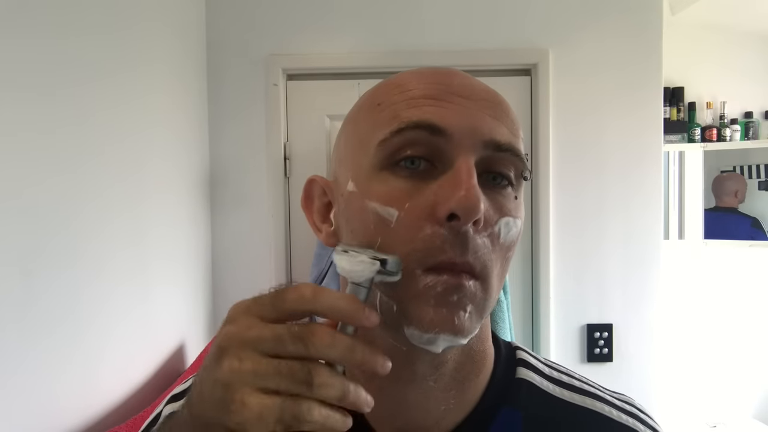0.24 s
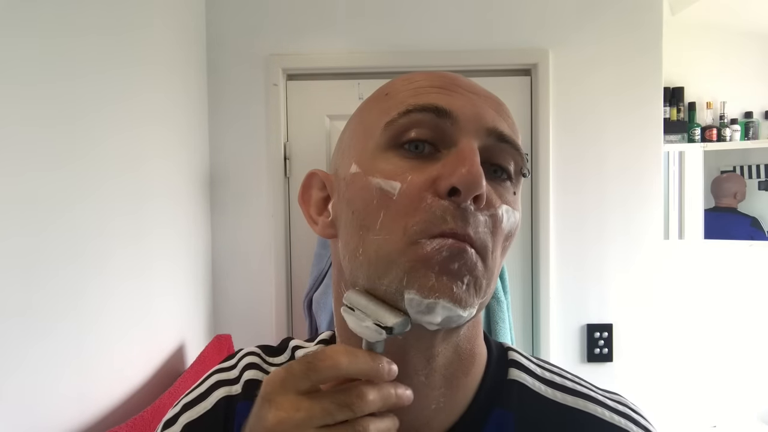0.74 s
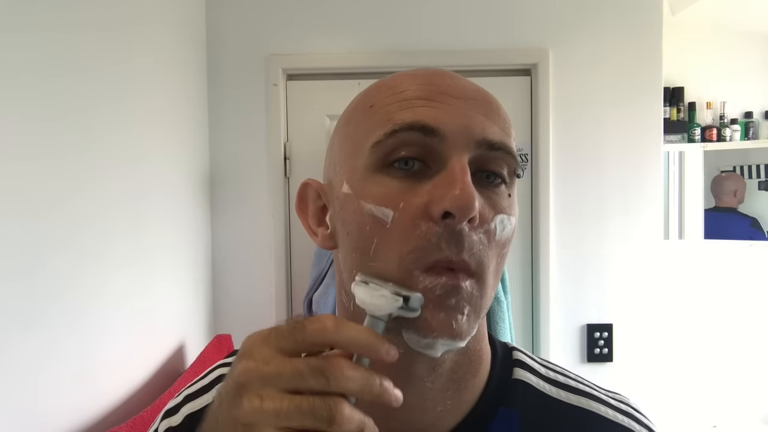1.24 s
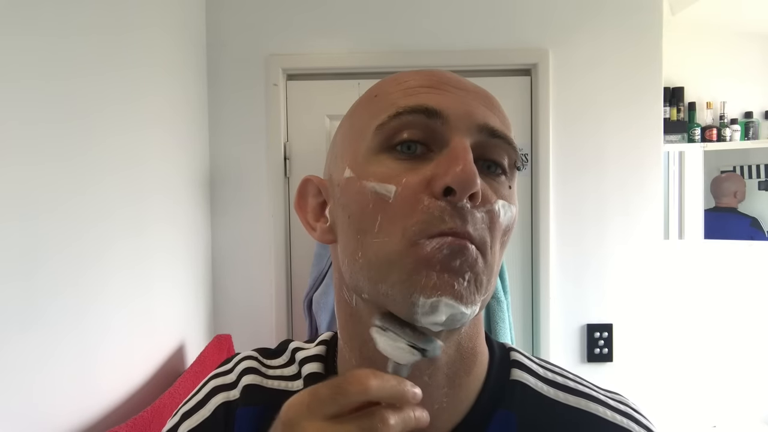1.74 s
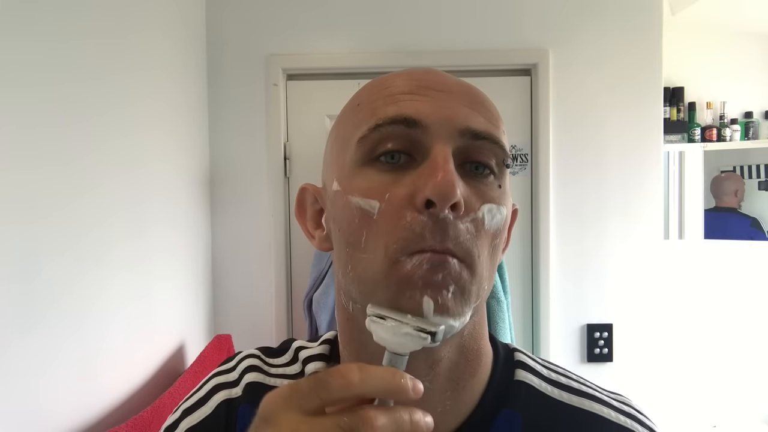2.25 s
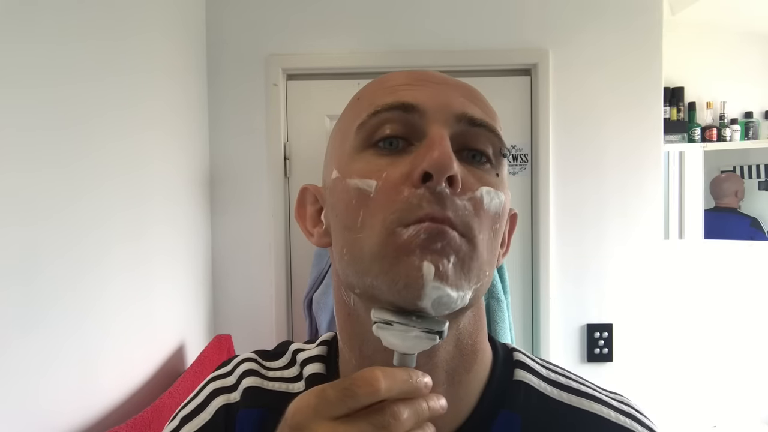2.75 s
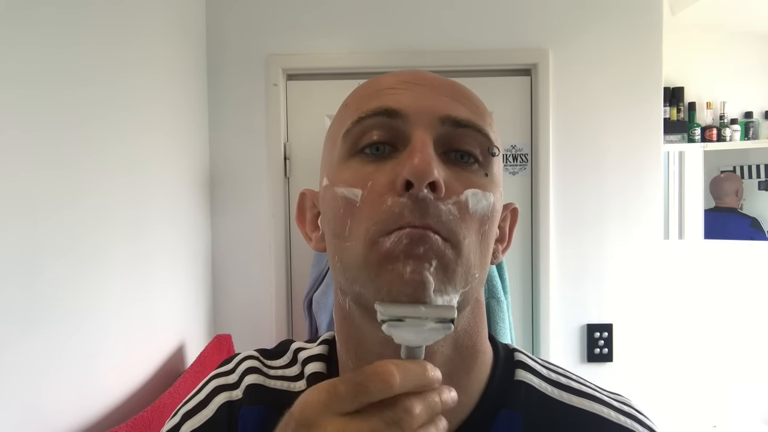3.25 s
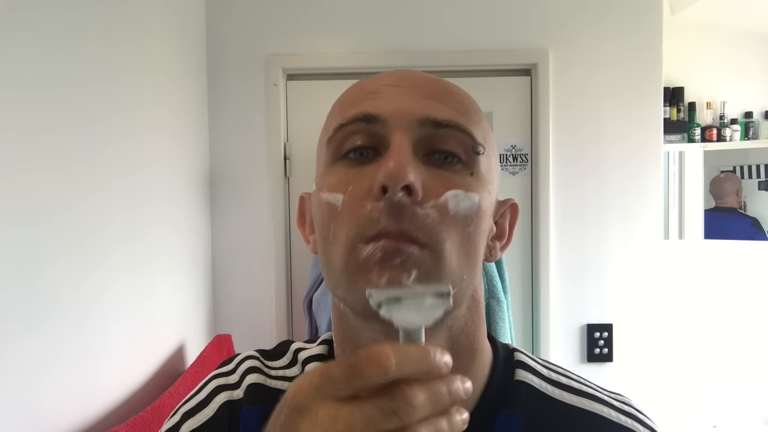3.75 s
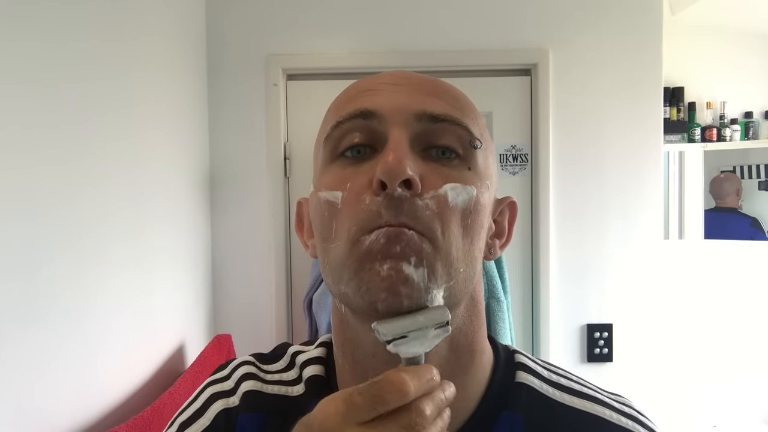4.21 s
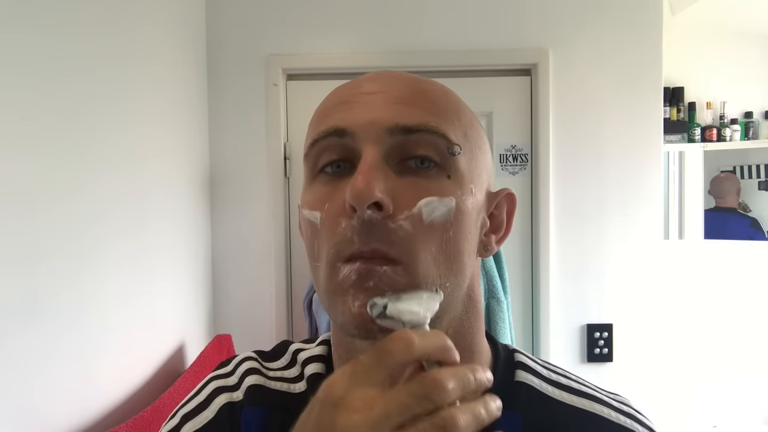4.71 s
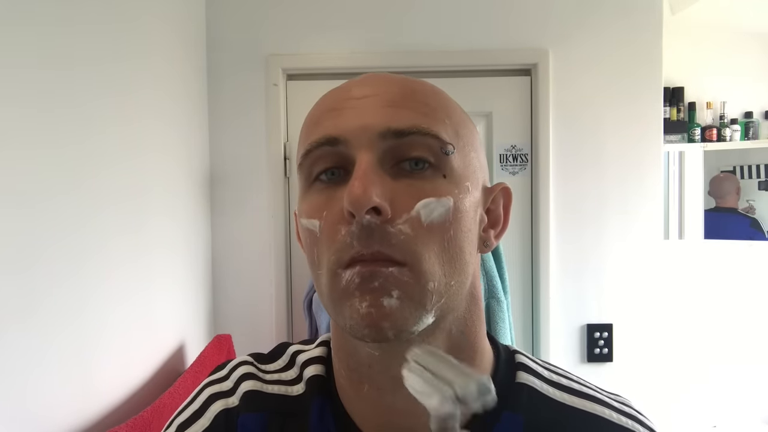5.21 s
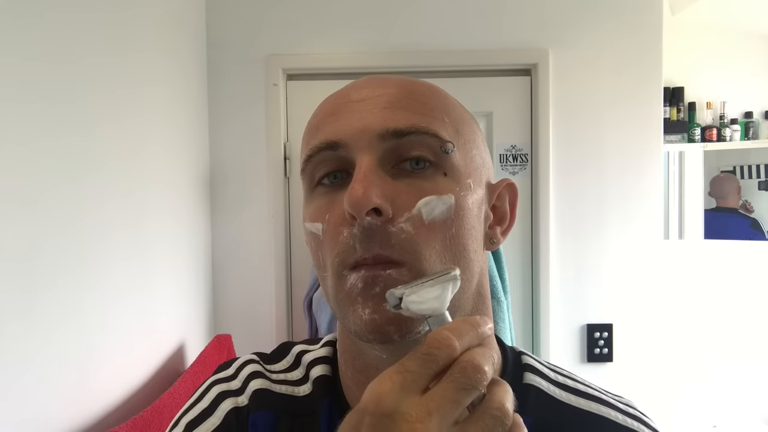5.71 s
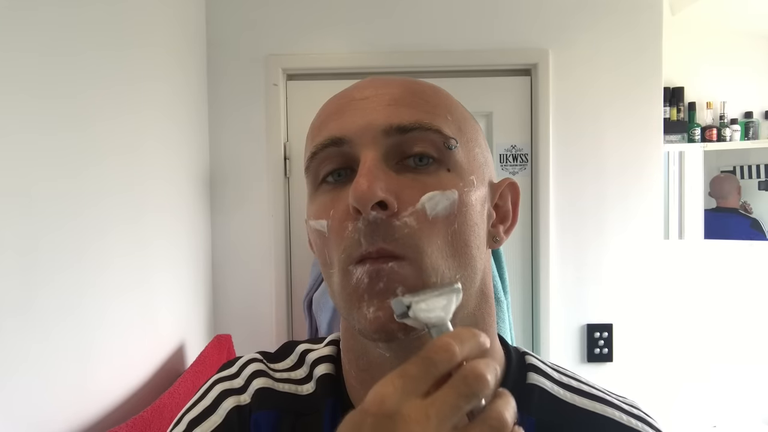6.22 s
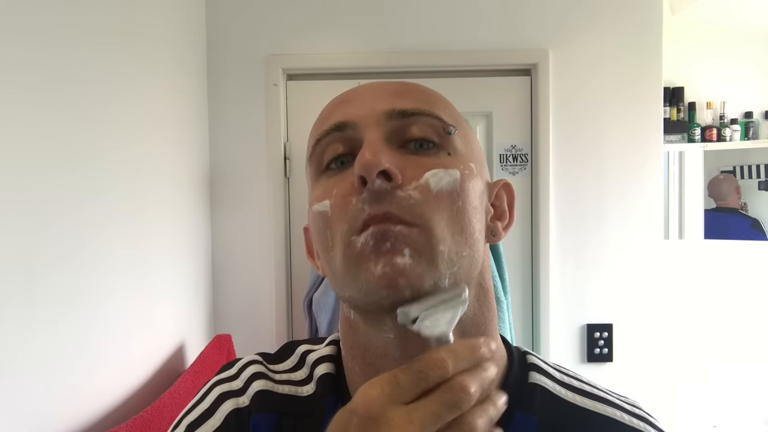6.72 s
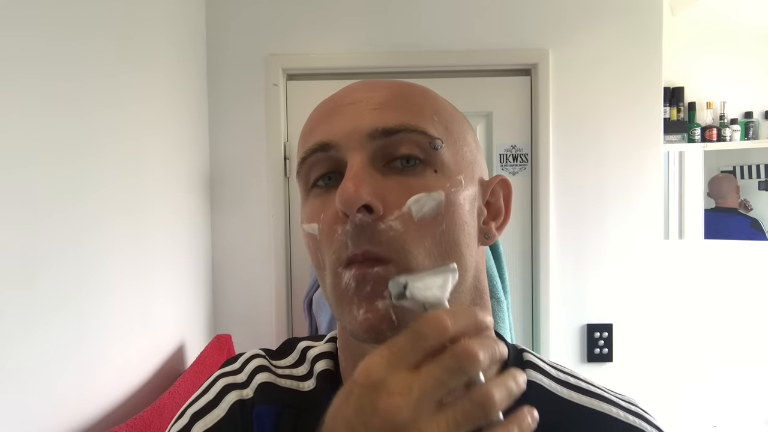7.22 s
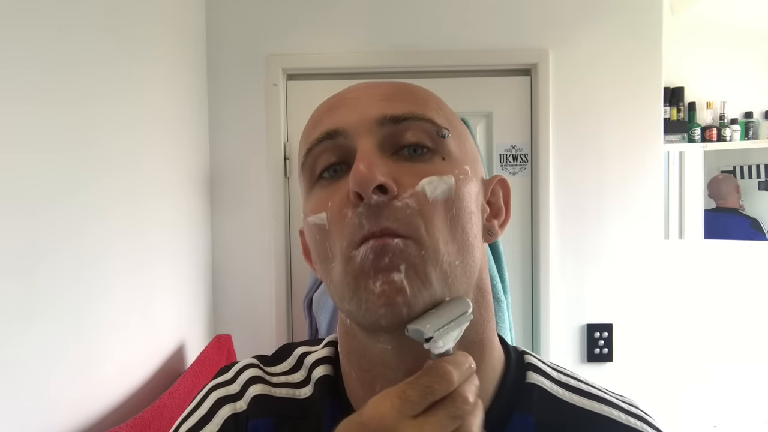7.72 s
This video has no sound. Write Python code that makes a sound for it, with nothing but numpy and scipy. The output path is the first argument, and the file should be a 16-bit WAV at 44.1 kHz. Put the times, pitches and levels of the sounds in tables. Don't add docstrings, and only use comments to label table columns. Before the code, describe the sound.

Close to a laptop microphone in a small quiet room, a razor makes about ten short strokes over lathered stubble. Each is a dry, high, crackling rasp of dense tiny snaps, with sharper single ticks from thick hairs and light taps as the blade lands and lifts. Between strokes there is only faint hiss, low rumble and a soft motor hum. Near the end the plastic head clicks once.

```python
import sys
import numpy as np
from scipy import signal
from scipy.fft import rfft, irfft
from scipy.io import wavfile
from scipy.ndimage import uniform_filter1d

SR = 44100
rng = np.random.default_rng(int(sys.argv[2]) if len(sys.argv) > 2 else 0)


def to_wav(s):
    ch = np.atleast_2d(s).T
    pcm = np.round(np.clip(ch, -1, 1) * 32767)
    wavfile.write(sys.argv[1], SR, pcm.astype(np.int16))


def invert_db(x):
    u = np.asarray(x, float) / 20
    return 10 ** u


N = 351036


def evened(x):
    return x / np.sqrt(np.mean(x ** 2) + 1e-20)


def read(points, hz):
    f, value = np.transpose(points)
    return np.interp(np.log(hz + 1), np.log(f + 1), value)


def resonate(x, hz, width):
    r, w = np.exp(-np.pi * width / SR), 2 * np.pi * hz / SR
    gain = (1 - r * r) / 2
    return signal.lfilter([gain, 0, -gain], [1, -2 * r * np.cos(w), r * r], x)


def drift(per_s):
    span = int(SR / per_s)
    wander = uniform_filter1d(rng.standard_normal(N), span)
    return evened(uniform_filter1d(wander, span))


def ring(clicks, modes, uneven_db=4.5):
    out, energy = np.zeros(N), 0
    for hz, width, db in modes:
        strike = invert_db(uneven_db * rng.standard_normal(N)) * rng.choice([-1., 1.], N)
        out += invert_db(db) * resonate(clicks * strike, hz, width) / np.sqrt(width)
        energy += invert_db(2 * db)
    uneven_gain = invert_db(uneven_db ** 2 * np.log(10) / 20)
    return out * np.sqrt(SR / np.pi / energy) / uneven_gain


# f/Hz, level/dB per Hz
AIR = [(130, -4), (150, -16), (170, -0.5), (350, -3.5), (420, -7.5), (800, -11), (1500, -16), (2700, -21),
       (3400, -20), (6200, -23), (8500, -27.5), (12000, -28.5), (16000, -31.5)]
# f/Hz, width/Hz, level/dB
RUMBLE = [(44, 14, -80), (69.4, 15.3, -60), (33.2, 10, -76), (101.9, 17.2, -59.5), (116.7, 16, -73),
          (207.3, 11, -79.5)]
# t/s, level/dB
PASSING = [(0, 4.5), (3, -2.5), (3.3, 6), (3.6, -2), (4.75, 0), (5.05, 5.5), (5.3, 5), (5.55, 1),
           (7.96, -1.5)]
# f/Hz, level/dB rms
HUM = [
    (45.1, -62),
    (90.1, -61),
    (179.9, -75),
]
AIR_DB = -63.5


def room_tone():
    hz, t = np.fft.rfftfreq(N, 1 / SR), np.arange(N) / SR
    hiss = irfft(rfft(rng.standard_normal(N)) * invert_db(read(AIR, hz)) * (hz > 125), N)
    modes = []
    for f, width, db in RUMBLE:
        mode = resonate(resonate(rng.standard_normal(N), f, width), f, 1.73 * width)
        modes.append(invert_db(db) * evened(mode))
    modes[1] *= invert_db(np.interp(t, *np.transpose(PASSING)))
    hum = np.zeros(N)
    for f, db in HUM:
        level = np.sqrt(2) * invert_db(db + 0.5 * drift(2.2))
        hum += level * np.sin(2 * np.pi * (f * t + rng.random()))
    return invert_db(AIR_DB) * evened(hiss) + sum(modes) + hum


# t/s, level/dB
JAW = [
    [(0.0, -57.5), (0.024, -58), (0.05, -73), (0.09, -82)],
    [(0.42, -74), (0.508, -65.5), (0.658, -60.5), (0.692, -57), (0.7, -45.5), (0.82, -49), (0.918, -62.5),
     (1.014, -57.5), (1.058, -81)],
    [(1.36, -72), (1.402, -65.5), (1.516, -49), (1.59, -45), (1.6, -40.5), (1.642, -45), (1.676, -53.5),
     (1.8, -50), (1.86, -88)],
]
# t/s, level/dB
CHIN = [
    [(2.217, -75), (2.222, -66), (2.288, -60), (2.3, -44.5), (2.368, -47.5), (2.516, -44.5), (2.586, -50),
     (2.72, -51.5), (2.765, -80)],
    [(3.166, -72), (3.19, -49), (3.206, -51), (3.316, -47.5), (3.358, -49), (3.418, -51), (3.488, -44.5),
     (3.61, -49.5), (3.704, -76)],
    [(4.062, -64), (4.068, -59.5), (4.112, -48.5), (4.18, -49), (4.28, -48.5), (4.44, -59.5), (4.462, -64),
     (4.492, -82)],
    [(4.79, -84), (4.828, -57.5), (4.878, -60.5), (4.94, -44), (5.008, -76.5), (5.04, -67)],
]
# t/s, level/dB
NECK = [
    [(5.916, -85), (5.921, -64), (5.954, -72), (5.959, -58.5), (6.006, -46), (6.04, -57.5), (6.09, -71)],
    [(6.29, -77), (6.343, -66), (6.348, -55.5), (6.4, -51.5), (6.452, -53), (6.46, -49), (6.51, -45.5),
     (6.634, -48.5), (6.738, -77)],
    [(7.05, -87), (7.068, -66), (7.086, -65), (7.104, -50), (7.132, -46.5), (7.178, -53.5), (7.19, -64),
     (7.26, -74)],
    [(7.44, -76), (7.636, -57.5), (7.666, -56.5), (7.726, -68), (7.742, -56.5), (7.776, -54.5),
     (7.842, -50.5), (7.908, -54), (7.96, -63)],
]
# 4 kHz rings/dB, 6-7 kHz rings/dB, their change by the lift/dB,
# 8-11 kHz rings/dB
ANGLES = [(3.5, 1.5, -7, 3.5), (2.5, 0.5, -3, -1), (1.5, 1, -2, -1), (1.7, -2.2, -4, -2),
          (1, -4.4, -17, -1.5), (2, -5, -15, 2.5), (3, 0, -2, 2.5), (1, 0, 0, 3.5), (0, 0, -1, 3),
          (0, -0.5, 0, 2), (1.5, 2, -1, 2.5)]
# bare edge at landing/dB, at lift/dB, hollow cartridge at landing/dB,
# at lift/dB, cheek drum/dB
ROLLS = [(-4, -7, -11, -7, -15), (-4, -10.5, -25, -14, -14.5), (-8, -8, -21, -8, -14.5),
         (-10.5, -8, -19, -9.5, -16), (-5, -4, -10, -9.5, -16), (-2, -4, -1.5, -9, -11.5),
         (-8, -2, -4.5, -5, -10), (-3, -5, -5, -11, -15.5), (-0.5, -3, -4.5, -7, -12.5),
         (-3, -4, -1, -19, -12), (-2, 0, -5, -3.5, -9.5)]
FIRM_DB = -47.5
CHEEK_SLACK, CARTRIDGE_SLACK, EDGE_SLACK = 0.18, 0.09, -0.099
EDGE_ARCH_DB = 2.5


def stroke_controls():
    t, controls = np.arange(N) / SR, np.zeros((7, N))
    for rows, angle, rolling in zip(JAW + CHIN + NECK, ANGLES, ROLLS):
        low, mid, mid_change, high = angle
        edge_land, edge_lift, cartridge_land, cartridge_lift, cheek = rolling
        s, db = np.transpose(rows)
        inside = (t >= s[0]) & (t <= s[-1])
        pressure = np.interp(t[inside], s, db)
        roll = (t[inside] - s[0]) / (s[-1] - s[0])
        slack = FIRM_DB - pressure
        edge = edge_land + (edge_lift - edge_land) * roll
        edge += EDGE_ARCH_DB * np.sin(np.pi * roll) + EDGE_SLACK * slack
        cartridge = cartridge_land + (cartridge_lift - cartridge_land) * roll + CARTRIDGE_SLACK * slack
        parts = [0, low, mid + mid_change * (roll - 0.5), high, edge, cartridge, cheek + CHEEK_SLACK * slack]
        for k, part_db in enumerate(parts):
            controls[k, inside] = invert_db(pressure + part_db)
    return controls


# f/Hz, width/Hz, level/dB
BLADES = [(4240, 130, -10), (4406, 150, -2.5), (3870, 350, 0), (5120, 680, 0), (5910, 250, -3.5),
          (6340, 200, -0.5), (6760, 77, -3), (7220, 210, -3.5), (7890, 440, -4.5), (8760, 260, -5),
          (9660, 700, -4), (10820, 320, -6.5)]
# f/Hz, width/Hz, level/dB
EDGE = [(11600, 1200, -7), (12700, 1200, -3), (13700, 1200, -2), (14700, 1200, -2), (15700, 1200, 0)]
# f/Hz, width/Hz, level/dB
CARTRIDGE = [(2977, 160, 2), (3276, 88, -0.5), (3407, 230, 5.5), (3380, 310, -2.5)]
# f/Hz, width/Hz, level/dB
CHEEK = [(2384, 110, 5.5), (2236, 72, 1.5), (1906, 330, 3.5), (1500, 410, -6), (940, 480, -0.5)]
HAIRS_PER_S, HAIR_SPREAD_DB, CLUMP_DB = 2600, 2.5, -0.5
TUFTS_PER_S, TUFT_DECAY_S = 110, 0.0022


def stubble(controls, thick_at, thick_tuft):
    tufts = rng.random(N) * (rng.random(N) < TUFTS_PER_S / SR)
    tufts[thick_at] = thick_tuft
    tufts = signal.lfilter([1], [1, -np.exp(-1 / (TUFT_DECAY_S * SR))], tufts)
    thickness = np.minimum(rng.exponential(1, N), 2.2)
    size = invert_db(HAIR_SPREAD_DB * thickness + CLUMP_DB * drift(34)) * (1 + 0.86 * tufts)
    hairs = size * (rng.random(N) < HAIRS_PER_S / SR)
    hairs /= np.sqrt(uniform_filter1d(hairs ** 2, 1800) + 1e-9)
    low, mid, high, edge, cartridge, cheek = controls[1:] * hairs
    out = invert_db(-6.5) * ring(low, BLADES[:4])
    out += invert_db(-5.5) * ring(mid, BLADES[4:8])
    out += invert_db(-7.5) * ring(high, BLADES[8:])
    out += ring(edge, EDGE)
    out += invert_db(-2.0) * ring(cartridge, CARTRIDGE)
    return out + invert_db(-2.0) * ring(cheek, CHEEK)


# t/s, peak level/dB, brightness/dB
TOUCHES = [(0.512, -35.5, -6), (0.545, -43, -4), (0.5606, -38, 10), (0.605, -37, -5), (0.6342, -32, -5),
           (0.6533, -33, -2), (0.6785, -33, -2), (1.0177, -37, -1), (1.0512, -38.5, 7), (1.3966, -43, -8),
           (1.4266, -33.5, -6), (1.8993, -49, 2), (2.077, -50, -20), (2.2322, -30, -2), (3.1248, -48, -9),
           (3.1683, -36.5, -10), (3.6906, -40, 3), (4.0043, -46.5, -6), (4.0764, -31, -13),
           (4.5047, -40.5, -2), (4.8166, -36.5, -6), (4.8367, -33.5, -4), (5.2191, -48, 14),
           (5.925, -39, -12), (6.293, -45, -12), (6.3507, -41, 0), (6.713, -39, -16), (7.0683, -29, 7),
           (7.531, -45, 2), (1.44, -35, -3)]
# t/s, peak level/dB, brightness/dB
THICKEST = [(0.7095, -31, -4), (0.7614, -24, -2), (0.7734, -24.5, -5), (1.4913, -27.5, 0), (1.546, -29, 0),
            (1.5672, -24.5, -8), (1.598, -27, -5), (1.7132, -31, -10), (1.61, -30, -6), (2.3849, -29, -15),
            (2.4102, -24.5, -21), (0.795, -24, -10), (2.6763, -29, 6), (3.2207, -32, -8),
            (3.2452, -27, -12), (3.292, -26, -12), (3.3192, -26, -11), (3.307, -30, 0), (3.4372, -28, 2),
            (3.587, -35, 5), (4.3562, -36, 11), (6.494, -26, 10), (6.401, -33, -6), (6.44, -30, -2),
            (6.46, -24, 2), (6.6128, -30, 13), (7.1034, -29, -2), (7.801, -32, 8), (7.8327, -28.5, -10),
            (7.9, -28, 11)]
THICK_PER_S, THICK_OVER_DB, THICK_SPREAD_DB = 70, 12.5, 2.5
THICK_BRIGHT_DB, THICK_BRIGHT_SPREAD_DB = 5.0, 5
THICK_SLACK = 0.2
LISTED_TUFT, CHANCE_TUFT = 1.3, 0.96


def single_snaps(controls):
    s, db, bright_db = np.transpose(TOUCHES + THICKEST)
    at = np.flatnonzero((rng.random(N) < THICK_PER_S / SR) & (controls[0] > 0))
    pressure = 20 * np.log10(controls[0, at])
    at_db = pressure + THICK_SLACK * np.clip(FIRM_DB - pressure, 0, 12) + THICK_OVER_DB
    at_db += THICK_SPREAD_DB * rng.standard_normal(len(at))
    at_bright = 20 * np.log10(controls[4, at] / controls[0, at]) + THICK_BRIGHT_DB
    at_bright += THICK_BRIGHT_SPREAD_DB * rng.standard_normal(len(at))
    tuft = np.r_[np.full(len(s), LISTED_TUFT), np.full(len(at), CHANCE_TUFT)]
    return np.r_[(s * SR).astype(int), at], np.r_[db, at_db], np.r_[bright_db, at_bright], tuft


def snaps(at, db, bright_db):
    dull_db = db - 10 * np.log10(1 + invert_db(2 * bright_db))
    dull, bright = np.zeros((2, N))
    dull[at] = invert_db(dull_db)
    bright[at] = invert_db(dull_db + bright_db)
    splinter = np.exp(-np.arange(90) / 64.0) * rng.standard_normal((2, 90)) * 0.15
    splinter[:, 0] = 1
    dull, bright = signal.oaconvolve([dull, bright], splinter, axes=1)[:, :N]
    crack = invert_db(6.5) * (resonate(dull, 4500, 1800) - resonate(dull, 7300, 2700))
    crack += invert_db(13.5) * resonate(resonate(bright, 13600, 5000), 14100, 5400)
    return crack + invert_db(1.5) * ring(dull, BLADES, 0.5) + invert_db(-7.5) * ring(dull, CARTRIDGE, 2.5)


# f/Hz, t60/s
WALLS = [
    (1000, 0.26),
    (4000, 0.17),
    (15000, 0.17),
]
WALLS_DB = -6


def walls(x):
    taps, spacing = np.zeros(SR // 2), 20
    at = np.arange(60, len(taps) - spacing, spacing)
    taps[at + rng.integers(0, spacing, len(at))] = rng.choice([-1., 1.], len(at))
    hz, t, bands = signal.stft(taps, SR, nperseg=128)
    decay = invert_db(-60 * t / read(WALLS, hz)[:, None])
    tail = signal.istft(bands * decay, SR, nperseg=128)[1]
    return signal.fftconvolve(x, tail / np.linalg.norm(tail))[:N]


# t/s, level/dB
PIVOT = [
    (7.7375, -33),
    (7.7465, -48),
]
# f/Hz, level/dB, t60/s
PIVOT_MODES = [
    (2428, -7, 0.07),
    (2340, -9, 0.03),
    (2530, -4, 0.036),
    (3400, -13, 0.01),
    (7250, -17, 0.008),
]


def pivot():
    t, out = np.arange(5000) / SR, np.zeros(N)
    click = np.zeros(len(t))
    for hz, db, t60 in PIVOT_MODES:
        click += invert_db(db - 60 * t / t60) * np.sin(2 * np.pi * hz * t)
    click *= np.minimum(t / 0.00091, 1)
    for s, db in PIVOT:
        out[int(s * SR):][:len(t)] += invert_db(db) * click
    return out


def scene():
    controls = stroke_controls()
    at, db, bright_db, tuft = single_snaps(controls)
    razor = stubble(controls, at, tuft) + snaps(at, db, bright_db) + pivot()
    return (room_tone() + razor + invert_db(WALLS_DB) * walls(razor))[None]


def low_pass(x):
    return signal.sosfilt(signal.butter(12, 16750, fs=SR, output="sos"), x)


# f/Hz, width/Hz, level/dB
LID_DIPS = [
    (4950, 250, -3),
    (10500, 450, -4),
]
EDGE_HZ = 15830


def record(dry):
    hz = np.fft.rfftfreq(N, 1 / SR)
    colour_db = np.zeros(len(hz))
    for f, width, db in LID_DIPS:
        colour_db += db * np.exp(-0.5 * ((hz - f) / width) ** 2)
    colour_db -= np.clip((hz - EDGE_HZ + 120) * 0.45, 0, 70)
    mix = irfft(rfft(dry) * invert_db(colour_db), N)
    return low_pass(mix)


dry = scene()
out = record(dry)
to_wav(out)
```